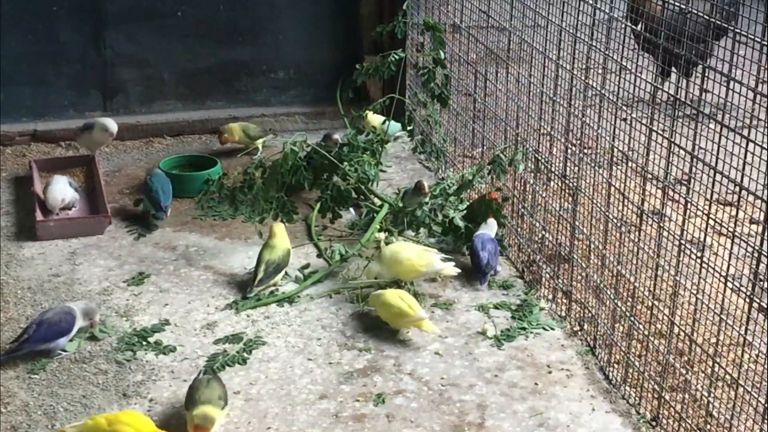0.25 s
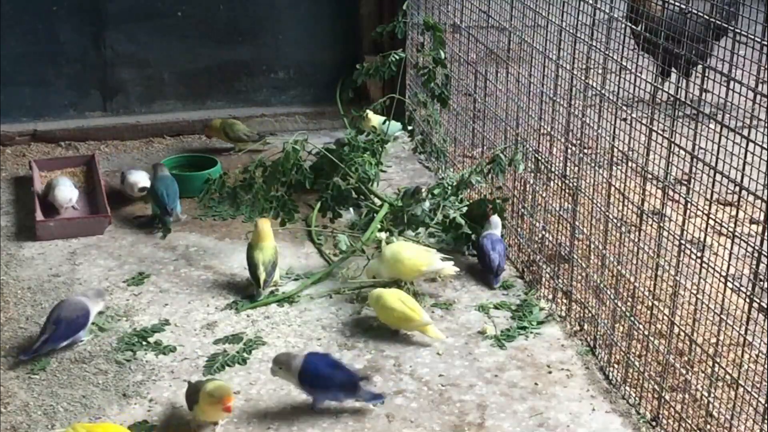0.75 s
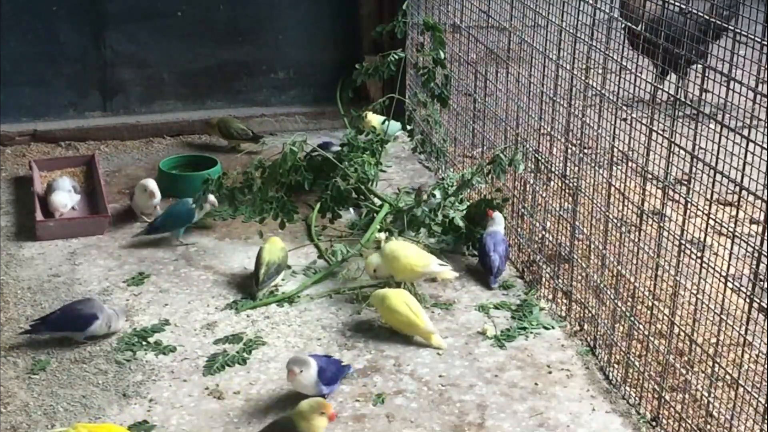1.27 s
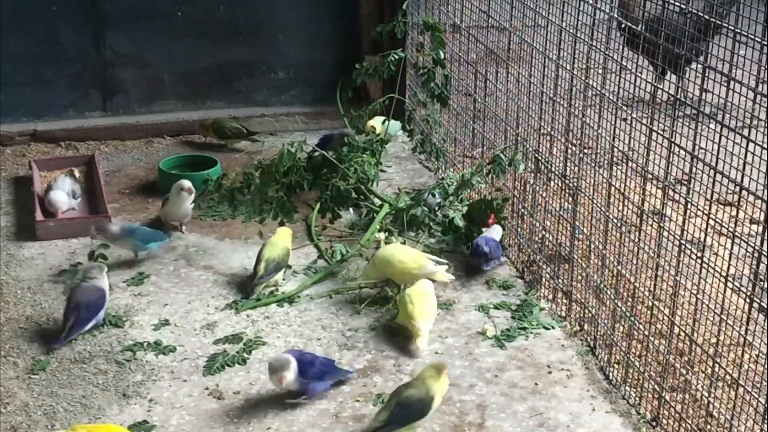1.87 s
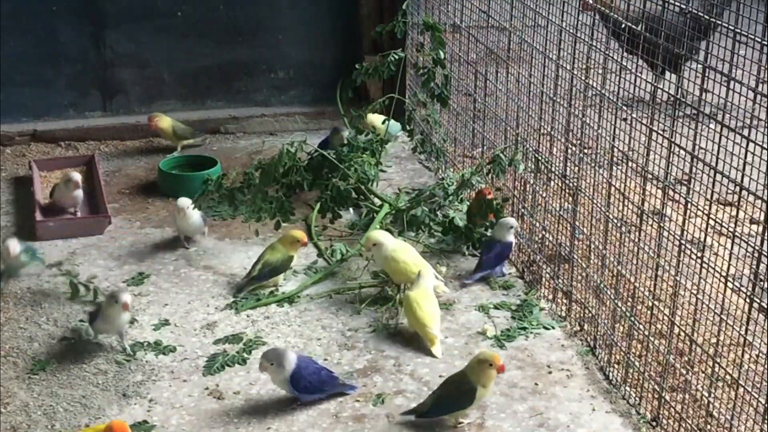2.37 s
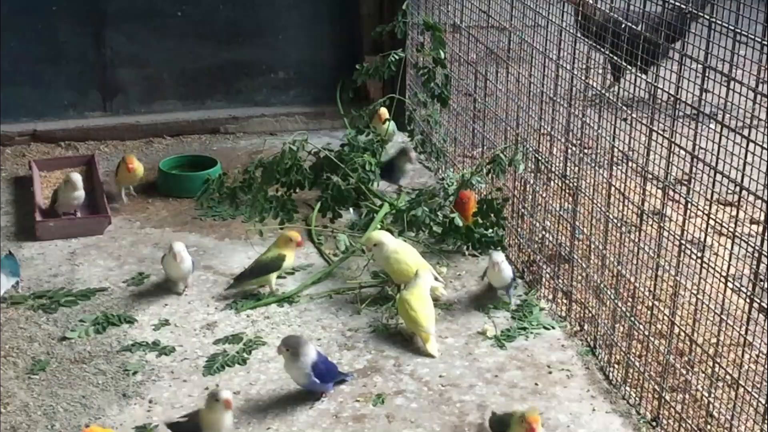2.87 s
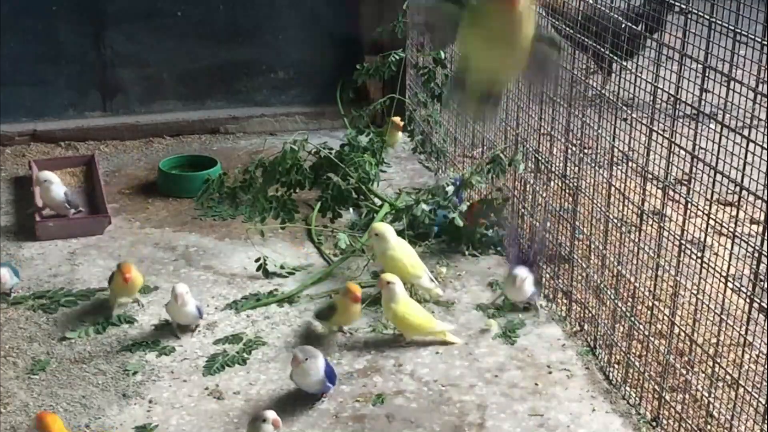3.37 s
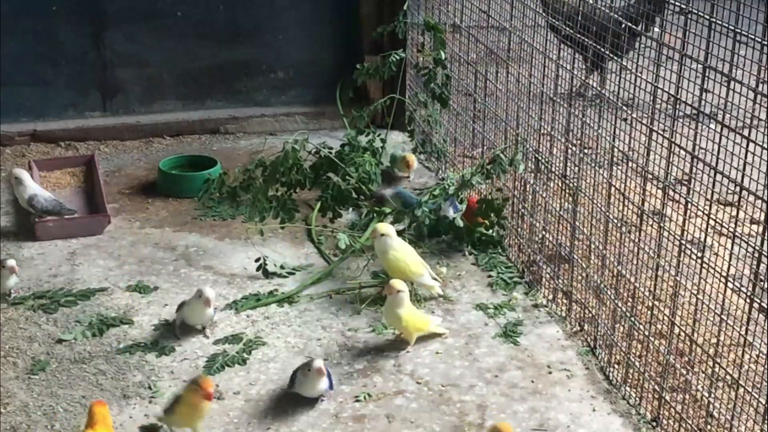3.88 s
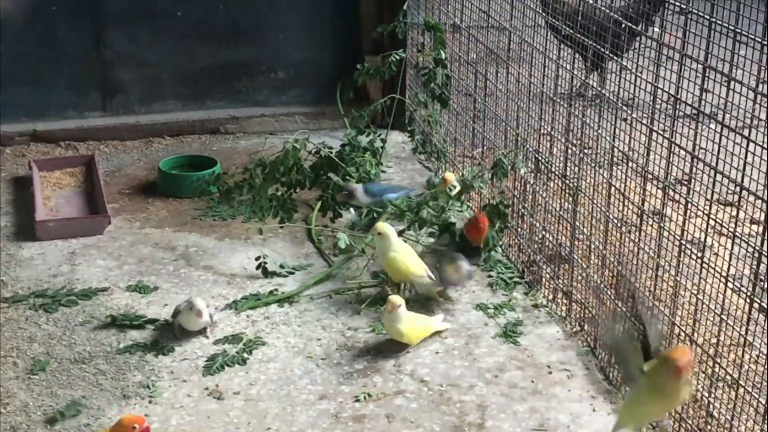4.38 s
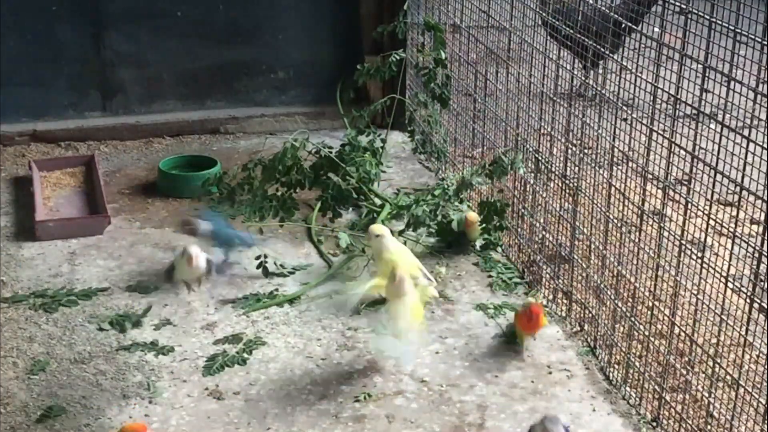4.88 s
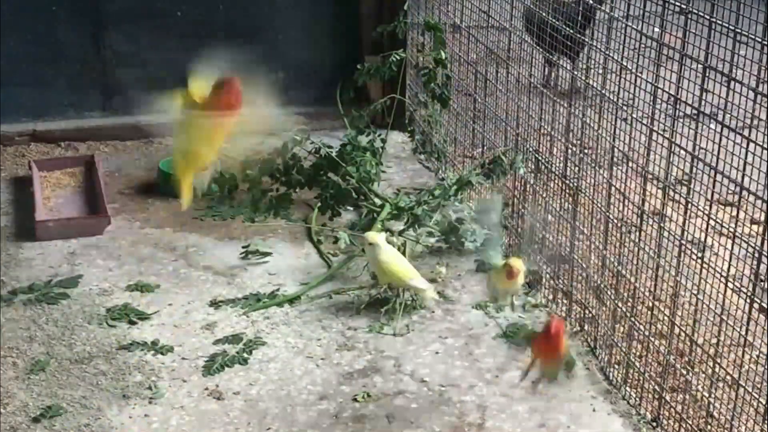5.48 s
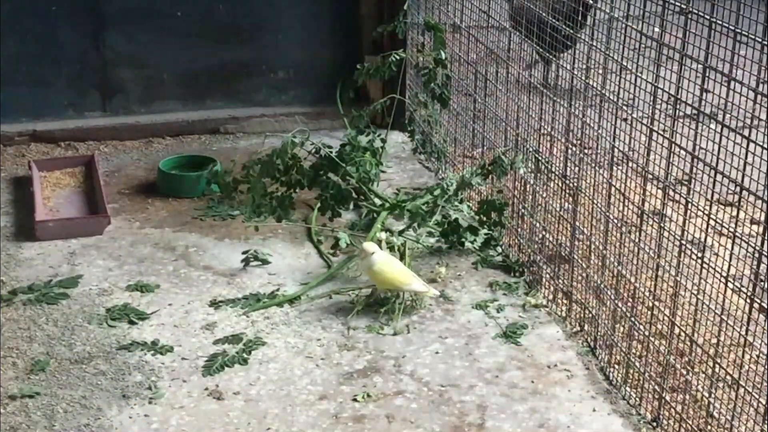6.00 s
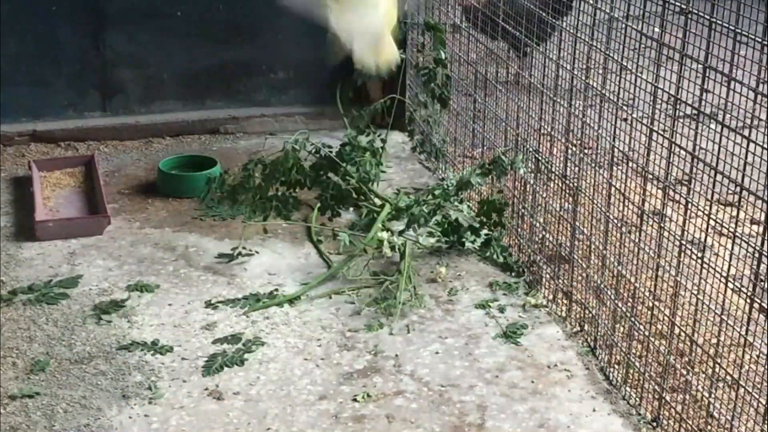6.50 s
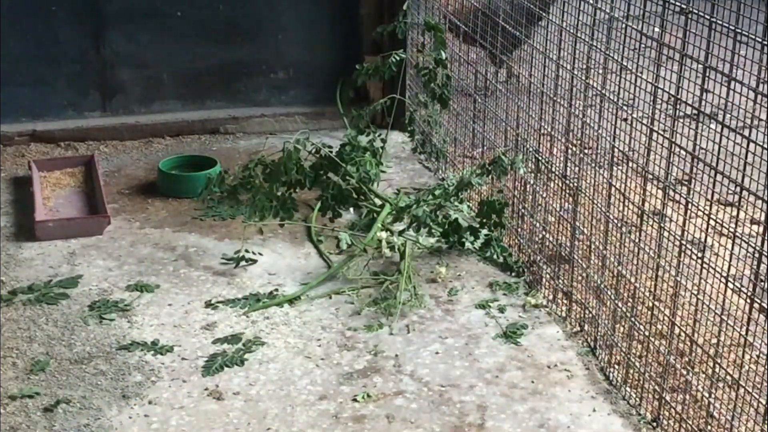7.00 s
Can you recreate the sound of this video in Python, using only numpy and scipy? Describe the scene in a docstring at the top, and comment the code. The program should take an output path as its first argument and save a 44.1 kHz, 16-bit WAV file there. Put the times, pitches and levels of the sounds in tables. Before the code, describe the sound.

A quick cluster of raspy, piercing chirps opens over a faint low hum. A hen clucks softly next door. Small parrots begin fluttering, first in scattered flaps, then in dense waves of wing claps, airy swishes and deep buffeting, with hollow panel booms. Sharp chirps cut through the late rush, then wings thin out and claws click on wire. Close microphone in a small, hard-walled aviary with short echoes.

```python
"""Small parrots feed on the floor of a wire aviary with sheet-metal walls, then take off one after another.
Their wings clap, swish and rumble: shaped noise, with puffs for dull beats and short breathy tones between.
Wall panels boom as dying sine tones; sharp chirps and a hen's clucks next door are gliding overtones,
the opening chirps with rough noisy breath. The wire rings and claws click on it as short noises, a low hum
lies behind, and delays echo the voices, noise bursts, claw clicks and breathy tones."""
import sys
import numpy as np
from scipy import signal
from scipy.io import wavfile

SR = 44100
rng = np.random.default_rng(int(sys.argv[2]) if len(sys.argv) > 2 else 0)


def master_out(mix):
    """Clip the mix to full scale and print it as 16-bit PCM to the path in sys.argv[1]."""
    frames = np.transpose(np.atleast_2d(mix))
    ceiling = np.clip(frames, -1, 1)
    pcm = np.round(ceiling * 32767).astype(np.int16)
    wavfile.write(sys.argv[1], SR, pcm)


def how_loud(loudness_db):
    """Turn decibels into a plain amplitude multiplier (0 dB gives 1, 20 dB gives 10)."""
    steps = np.asarray(loudness_db, float) / 20
    return 10 ** steps


N = 319725  # length in samples


def rms_one(x):
    """Scale a sound to an average (rms) level of 1."""
    return x / np.sqrt(np.mean(x ** 2) + 1e-20)


def at_hz(points, hz):
    """Read a curve of (Hz, dB) points at any pitch, along a logarithmic pitch scale."""
    curve_hz, curve_db = np.array(points).T
    return np.interp(np.log(hz), np.log(curve_hz), curve_db)


def band(x, low_hz, high_hz):
    """Keep mainly the sound between two pitches."""
    sos = signal.butter(2, [low_hz, min(high_hz, .45 * SR)], "band", fs=SR, output="sos")
    return signal.sosfilt(sos, x)


def drift(rate_hz):
    """Slow chance: noise through a double one-pole low-pass; spread 1."""
    r = np.exp(-2 * np.pi * rate_hz * 40 / SR)  # one value per 40 samples
    noise = rng.standard_normal(N // 40 + 2002)
    slow = signal.lfilter([1], [1, -2 * r, r * r], noise)[2000:]  # skip the filter's start
    return np.interp(np.arange(N) / 40, np.arange(len(slow)), rms_one(slow))


def add(out, start_s, sound):
    """Mix a sound in at its start time, cut at the end of the scene."""
    i = round(start_s * SR)
    out[i:i + len(sound)] += sound[:N - i]


def burst(rise_s, t60_s):
    """Loudness shape that rises fast and dies by 60 dB per t60_s; it ends after 0.4 s."""
    t = np.arange(int(SR * .4)) / SR
    return (1 - np.exp(-t / rise_s)) * how_loud(-60 * t / t60_s)


def air(spectrum, patchy_db, flicker_hz):
    """Half-octave bands of noise, each with its own level and flicker; rms 1."""
    lowest_hz, highest_hz = spectrum[0][0], spectrum[-1][0]
    edges = lowest_hz * 2 ** np.arange(0, np.log2(highest_hz / lowest_hz) + .5, .5)
    out, together, white = 0, drift(flicker_hz), rng.standard_normal((2, N))
    for k, (low, high) in enumerate(zip(edges, edges[1:])):
        flicker = 0.72 * together + drift(flicker_hz)  # partly shared by all bands
        gain_db = at_hz(spectrum, np.sqrt(low * high)) + patchy_db * flicker
        out = out + how_loud(gain_db) * band(white[k % 2], low, high)
    return rms_one(out)


def strokes(per_s, lift_db, t60_s):
    """Gain that swells at random instants and dies back to 1: single feather strokes among the many."""
    spread_db = 4.0 * np.clip(rng.standard_normal(N), -2, 1.5)
    kicks = (rng.random(N) < per_s / SR) * how_loud(lift_db + spread_db)
    soft = np.exp(-1 / (.004 * SR))  # 4 ms rise
    fall = how_loud(-60 / (t60_s * SR))
    return 1 + signal.lfilter([1 - soft], np.convolve([1, -soft], [1, -fall]), kicks + 1e-18)


# tones the sheet walls favour: pitch_hz, width_hz, level_db (shifted by hum_db below)
WALL_TONES = [(414, 41, 1.5), (665, 53, 0.5), (939, 32, -2), (1120, 34, 0), (1660, 42, -6), (2300, 71, -4)]


def walls(x, hum_db):
    """Noise sets the sheet walls humming: resonances whose strengths drift by chance."""
    out = x
    for hz, width_hz, db in WALL_TONES:
        r = np.exp(-np.pi * width_hz / SR)
        fed = x * how_loud(db + hum_db + 2.27 * drift(4.9))
        ring = [1, -2 * r * np.cos(2 * np.pi * hz / SR), r * r]
        out = out + signal.lfilter([(1 - r * r) / 2, 0, (r * r - 1) / 2], ring, fed + 1e-18)
    return out


# the flock's stir over time: start_s, downwash_db (on the microphone), drone_db, swish_db, hiss_db
# (swish is set 5.5 dB lower below)
STIR = [(0, -50, -35.5, -51, -43), (.08, -47, -39, -48.5, -52.5), (0.26, -55, -49, -65.5, -64.5),
        (.45, -59, -43, -52.5, -56), (.8, -58, -50.5, -57.5, -63), (1.8, -59, -47, -59, -65),
        (2.05, -73, -41.5, -37.5, -60), (2.4, -51.5, -35, -62, -61), (2.7, -65, -33.5, -35.5, -60.5),
        (2.93, -59, -40, -47.5, -62), (3.2, -41, -38, -37.5, -51.5), (4.1, -30.5, -38.5, -35, -46),
        (4.75, -38, -37.5, -38, -47.5), (5.05, -29, -35, -32, -47.5), (5.55, -45, -37, -43.5, -44.5),
        (5.78, -26, -31.5, -32, -38), (6.0, -38, -39, -38.5, -48.5), (6.68, -37.5, -45, -47, -52),
        (6.9, -32.5, -35, -40, -44.5), (7.25, -47.5, -36, -52.5, -57)]
# tone colours of the four kinds of stirred air, each: pitch_hz, level_db (per Hz)
DOWNWASH = [(18, -37), (30, -9), (65, -3), (110, -4.5), (140, -47), (240, -120)]
DRONE = [(35, -35), (60, -10), (129, 1), (250, -18.5), (390, -38), (660, -120)]
SWISH = [(120, -30), (200, -2), (337, -5.5), (657, -5.5), (1250, -8.5), (1600, -15), (3000, -21.5),
         (3900, -27), (6600, -120)]
HISS = [(710, -51), (1200, -0.5), (4190, -5), (7020, -8), (7730, -19), (8700, -10), (15700, -12.5)]


def stir():
    """Many wings at once blur into buffeting, drone, swish and hiss."""
    start_s, *levels = np.transpose(STIR)
    wash_db, drone_db, swish_db, hiss_db = [np.interp(np.arange(N) / SR, start_s, c) for c in levels]
    wash = how_loud(wash_db) * air(DOWNWASH, patchy_db=-2.0, flicker_hz=9.1)
    drone = how_loud(drone_db) * air(DRONE, patchy_db=4.5, flicker_hz=14.8)
    swish = strokes(per_s=18, lift_db=1.0, t60_s=0.17) * air(SWISH, patchy_db=2.0, flicker_hz=23.0)
    swish = walls(how_loud(swish_db - 5.5) * swish, hum_db=1.0)
    hiss = strokes(per_s=4.6, lift_db=-9.0, t60_s=0.052) * air(HISS, patchy_db=3.0, flicker_hz=17)
    return wash + drone + swish + how_loud(hiss_db) * hiss


HUM_HZ, HUM_WIDTH_HZ, HUM_DB, HUM_FADES_S = 85.4, 7.8, -46, 1.3  # HUM_DB: before the fade


def hum():
    """A faint, wavering low hum from somewhere outside: narrow noise that soon fades by 8 dB."""
    low_hz, high_hz = HUM_HZ - HUM_WIDTH_HZ / 2, HUM_HZ + HUM_WIDTH_HZ / 2
    noise = band(rng.standard_normal(N + SR), low_hz, high_hz)[SR:]
    fade_db = -8 / (1 + np.exp((HUM_FADES_S - np.arange(N) / SR) / 0.14))
    return how_loud(HUM_DB + fade_db) * rms_one(noise)


# chirp syllables: overtones_db (added to a plain voice), rasp (0-1),
# then the glide as rows of start_s, pitch_hz, level_db (at the voice organ)
CHIRPS = [(-1, 0.8, [(0, 4934, -18.5), (.007, 4770, -18.5), (.016, 4730, -17.5), (.021, 4400, -13.5),
          (.032, 4240, -23)]), (-10.5, 0.18, [(.018, 4100, -25), (.022, 3856, -12), (.043, 3845, -26.5)]),
          (4.5, .6, [(0, 1965, -21), (.011, 2267, -21), (.021, 2390, -24.5)]), (0.5, .5, [(0, 3060, -13),
          (.014, 3075, -25)]), (-12.5, 0.63, [(.072, 3930, -23), (.075, 3820, -18), (.08, 3686, -32),
          (.095, 3960, -12), (.107, 3870, -16.5), (.12, 3620, -24.5)]), (-17, 0.38, [(.078, 2474, -25.5),
          (.092, 2614, -21.5), (.11, 2300, -17), (.114, 2260, -20.5)]), (3.5, 0.28, [(.112, 1955, -20.5),
          (.119, 1566, -17), (.128, 1582, -21), (.142, 1580, -27)]), (-28, 0.41, [(.168, 3320, -24.5),
          (.18, 3030, -13), (.19, 3020, -33), (.197, 2744, -23), (.225, 2640, -38)]),
          (-17, 0.51, [(2.191, 3250, -40), (2.225, 3300, -40)]), (0, .6, [(2.2, 11570, -68),
          (2.22, 11800, -59), (2.3, 11050, -54)]), (-23, 0.5, [(5.505, 3370, -37), (5.56, 3240, -35)]),
          (-3, 0.41, [(5.739, 6530, -27), (5.762, 6320, -38)]), (0, 0.088, [(5.735, 1997, -27.5),
          (5.744, 2347, -5), (5.7485, 2520, -10.5)]), (3.5, 0.16, [(5.751, 2520, -9), (5.755, 2602, -8.5),
          (5.767, 2690, -7.5), (5.772, 2650, -15.5), (5.79, 2710, -12.5)]),
          (-10.5, 0.93, [(5.771, 6170, -16), (5.778, 6500, -17), (5.788, 6180, -16.5), (5.797, 6070, -11.5),
          (5.801, 6040, -27)]), (2, 0.13, [(6.379, 2870, -16), (6.383, 3016, -12), (6.389, 3236, -9)]),
          (-5.5, 0.31, [(6.389, 3534, -6.5), (6.395, 4000, -12.5), (6.4, 4710, -5.5), (6.403, 5020, -15)]),
          (-6.5, 0.6, [(6.408, 6160, -12.5), (6.415, 6940, -19.5), (6.419, 6550, -4.5), (6.424, 6840, -8.5),
          (6.429, 7180, -24)]), (0, 0.12, [(6.429, 7120, -4), (6.4325, 5250, -11), (6.439, 4890, -7.5),
          (6.444, 4443, -5.5), (6.459, 4270, -19.5), (6.48, 4390, -28)])]
# second to fifth partial of a plain voice: level_db
OVERTONES_DB = [-7.5, -19.5, -24, -19.5]
# how the beak colours the voice: pitch_hz, level_db
BEAK = [(1500, -12.5), (2900, -11.5), (4000, -3), (7000, 0), (8300, -6.5), (10200, -2.5), (11300, -8),
        (12600, 6.5), (14600, -20), (16000, -93.5)]


def chirps(throb_low_hz, throb_high_hz, waver):
    """Gliding overtones through the beak; the voice organ's throb and waver blur the upper ones most."""
    out = np.zeros(N)
    for bright_db, rasp, glide in CHIRPS:
        s, hz, db = np.transpose(glide)
        t = np.arange(s[0], s[-1], 1 / SR)
        noises = rng.standard_normal((2, len(t) + 2000))
        throb, shake = [rms_one(band(n, throb_low_hz, throb_high_hz)[2000:]) for n in noises]
        pitch = np.interp(t, s, hz)
        phase = 2 * np.pi * np.cumsum(pitch) / SR + waver * rasp * shake
        tone = 0
        for k, partial_db in enumerate([0, *np.add(OVERTONES_DB, bright_db)], 1):
            blur = 0.5 * (k - 1) ** 2.5 * rasp * throb
            tone = tone + how_loud(partial_db + at_hz(BEAK, k * pitch)) * np.sin(k * phase + blur)
        edge = signal.windows.tukey(len(t), min(0.0036 * SR / len(t), 1))  # no click at the ends
        loudness = np.sqrt(2) * how_loud(np.interp(t, s, db)) * (1 + rasp * throb)
        add(out, s[0], loudness * tone * edge)
    return out


# noise bursts: the rough breath of the opening chirps, then wing claps and claw scuffs:
# start_s, level_db (per band near 2 kHz), body_db and treble_db (both relative to level_db)
NOISE_BURSTS = [(0.002, -39.5, -56, 12), (0.08, -42, -29, -3), (0.16, -34, -24, -27),
                (0.418, -53, 7.5, -21), (0.604, -57, 15.5, -33), (1.2, -55, 6.5, -17),
                (1.904, -51.5, -24, -18), (1.9477, -40, 1, -21), (2.229, -47, 0, -15),
                (2.528, -40, 2.5, -15.5), (2.618, -44, 4, -27), (2.797, -38, -4, -4),
                (3.018, -35, 2.5, -16), (3.194, -34.5, -7, -24), (3.264, -35.5, -9, -30),
                (3.324, -39, 12.5, -13), (3.38, -32.5, -4, -14), (3.48, -39, -8, -7.5),
                (3.5515, -37.5, 6, -17.5), (3.597, -31.5, 4.5, 0), (4.001, -23, -5.5, -10.5),
                (4.159, -29, -16, -5.5), (4.202, -33.5, -1, -22), (4.827, -36, -7, 0.5),
                (4.895, -34.5, -1, -7.5), (4.976, -43, -11, -3.5), (4.99, -30, -41, 0.5),
                (5.3339, -37.5, -7, -8.5), (5.4943, -44.5, -16, -5.5), (5.727, -31.5, -31, -7.5),
                (6.128, -51.5, 12, -21), (6.747, -50, 8, -4), (7.075, -45, 4, -23)]
BURST_T60_S = 0.17  # ring-out near 2.5 kHz of a burst at -33.5 dB
BURST_LINGERS = 0.072  # dB of ring-out time per dB of burst
BURST_TOP_DB = -9.5  # the topmost air relative to the treble


def noise_bursts():
    """Crackly noise bands, coloured anew for each burst; the treble starts sharper and dies sooner."""
    out, centres = np.zeros(N), 500 * 2 ** np.arange(0, 5, .25)  # quarter octaves
    crackle = rng.standard_normal((2, N)) * how_loud(0.4 * drift(120))
    own_db = rng.normal(0, 2.8, (len(NOISE_BURSTS), len(centres)))
    late_s = rng.exponential(0.0025, (len(NOISE_BURSTS), len(centres)))  # bands start at uneven instants
    for k, hz in enumerate(centres):
        gate = np.zeros(N)
        snap = 1.33 * burst(6.7 / hz, 0.036)  # a dry snap opens every burst
        for (s, db, body_db, treble_db), colour_db, lag_s in zip(NOISE_BURSTS, own_db, late_s):
            colour = [(800, body_db), (1900, 0), (4000, 0.071 * treble_db), (8000, treble_db),
                      (10300, treble_db), (12000, treble_db + BURST_TOP_DB)]
            level_db = db + at_hz(colour, hz) + colour_db[k]
            t60_s = BURST_T60_S * how_loud(BURST_LINGERS * (db + 33.5)) * (2500 / hz) ** 0.13
            add(gate, s + lag_s[k], how_loud(level_db) * (burst(25.2 / hz + 0.0028, t60_s) + snap))
        out += gate * rms_one(band(crackle[k % 2], hz / 2 ** .09, hz * 2 ** .09))
    return out


# hen clucks: start_s, level_db, pitch_hz (at the start), length_s, hoarseness (0-1)
CLUCKS = [(0.946, -37, 368, 0.056, 0.5), (1.263, -37, 338, 0.046, 0.27), (1.304, -45.5, 352, 0.038, 0.46),
          (1.375, -45.5, 354.3, 0.11, 0.18), (1.41, -39, 338, 0.066, 0.1), (1.507, -45.5, 325, 0.037, 0.17),
          (1.56, -39, 290, 0.032, 0.04), (1.677, -39, 283.5, 0.048, 0.11), (1.783, -38, 358.6, 0.087, 0.39),
          (2.667, -33, 321.6, .1, .5), (2.824, -31.5, 318, 0.054, 0.26),
          (3.328, -27.5, 340.7, 0.0556, 0.25)]
# how the hen's throat colours the voice: pitch_hz, level_db
HEN_THROAT = [(250, -4), (400, -2), (680, 2), (900, -2.5), (1150, -8), (1400, -21), (1700, -25),
              (2200, -35)]


def hen():
    """Short low clucks: bending overtones through the throat, the hoarse ones shaken in level and pitch."""
    out = np.zeros(N)
    for s, db, hz, length_s, hoarse in CLUCKS:
        t = np.arange(0, length_s, 1 / SR)
        noises = rng.standard_normal((2, len(t) + 2000))
        throb, shake = [rms_one(band(n, 13.0, 73)[2000:]) for n in noises]
        phase = 2 * np.pi * (hz * t + 100 * t ** 2) + 1.52 * hoarse * shake  # rises 200 Hz per s
        tone = sum(how_loud(at_hz(HEN_THROAT, k * hz)) * np.sin(k * phase + k * k) for k in range(1, 11))
        swell = np.sin(np.pi * (t / length_s) ** 0.59)
        add(out, s, how_loud(db) * tone * (1 + hoarse * throb) * swell)
    return out


# dull wing beats, each a puff of air with its own colour: start_s, level_db, centre_hz, t60_s
BEATS = [(0.955, -35, 784, 0.23), (2.05, -43, 1880, 0.28), (2.103, -38, 585, 0.65), (2.636, -36, 592, 0.39),
         (2.952, -28.5, 945, 0.25), (3.086, -35.5, 2220, 0.48), (3.092, -31.5, 740, 0.62),
         (3.162, -17, 390, 0.082), (3.28, -29, 932, 0.52), (3.744, -21, 713, 0.13),
         (4.353, -21, 1840, 0.13), (4.707, -28.5, 1120, 0.077), (4.806, -32.5, 2120, 0.55),
         (6.573, -34, 910, 0.059)]


def beats():
    """A downstroke swells softly and stays dull: a narrow and a wide band of noise together."""
    out = np.zeros(N)
    for s, db, hz, t60_s in BEATS:
        shape = burst(5.4 / hz, t60_s)
        noise = rng.standard_normal((2, len(shape)))
        low, high = max(260, hz / 2), max(1350, hz * 1.5)
        narrow = rms_one(band(noise[0], hz / 1.018, hz * 1.092))
        wide = rms_one(band(band(noise[1], low, high), low, high))
        add(out, s, how_loud(db) * shape * (narrow + 0.93 * wide))
    return out


# short breathy tones: hollow pops among the wing beats, a few higher notes, and a faint call near 4.4 kHz:
# start_s, level_db, pitch_hz, t60_s
BREATHY_TONES = [(2.715, -30.5, 1143, 0.23), (2.84, -30, 927, .15), (5.515, -35.5, 4405, .3),
                 (1.415, -51.5, 1660, 0.47), (5.338, -32.5, 5300, .12), (3.485, -26.5, 964, .1),
                 (3.605, -20.5, 1090, 0.14), (3.892, -17, 708, 0.038), (3.381, -18, 1787, 0.086),
                 (4.896, -21, 2275, .08), (4.008, -22, 1075, 0.16), (4.078, -23.5, 1064, 0.14),
                 (4.112, -27.5, 1630, 0.14), (4.163, -18, 1660, 0.11), (4.178, -23, 747, 0.24),
                 (5.059, -20.5, 546, 0.058), (5.1, -20.5, 638, 0.073), (5.678, -23.5, 498, 0.078),
                 (5.708, -21, 1200, 0.035), (5.757, -13.5, 1056, 0.034), (5.853, -15, 1055, 0.046)]


def breathy_tones():
    """Each is one sine tone with a little noise around its pitch, which swells and dies."""
    out = np.zeros(N)
    for s, db, hz, t60_s in BREATHY_TONES:
        shape = burst(2.3 / hz, t60_s)
        breath = rms_one(band(rng.standard_normal(len(shape)), hz / 1.16, hz * 1.18))
        tone = np.sin(2 * np.pi * hz * np.arange(len(shape)) / SR)
        add(out, s, how_loud(db) * shape * (tone + 0.38 * breath))
    return out


# booms of a wall panel: start_s, level_db, t60_s
BOOMS = [(1.998, -29, 0.4), (2.181, -25.5, 0.65), (3.607, -26, 0.52), (3.995, -21, 0.26),
         (4.212, -16.5, 0.81)]
PANEL_HZ = 142.7


def booms():
    """A bird kicking off or landing sets the sheet wall droning at its lowest natural pitch."""
    out = np.zeros(N)
    for s, db, t60_s in BOOMS:
        shape = burst(0.0029, t60_s)
        add(out, s, how_loud(db) * shape * np.sin(2 * np.pi * PANEL_HZ * np.arange(len(shape)) / SR))
    return out


# wire mesh brushed by a wing: start_s, level_db, t60_s
PINGS = [(4.165, -42.5, .12), (4.829, -32, 0.23), (4.985, -32, 0.22), (5.338, -35, 0.23)]
WIRE_HZ = 14800


def wire():
    """A thin, very high ring that shivers as it dies: very narrow noise."""
    gate = np.zeros(N)
    for s, db, t60_s in PINGS:
        add(gate, s, how_loud(db) * burst(0.0038, t60_s))
    return gate * rms_one(band(rng.standard_normal(N), WIRE_HZ - 60, WIRE_HZ + 60))


# claws grip the wire: start_s, level_db (click and rattle are set from it below)
TICKS = [(6.8075, -24.5), (6.8607, -12), (6.867, -20), (6.8923, -14.5), (6.9211, -15)]
TICK_LOW_HZ, TICK_HIGH_HZ, TICK_T60_S = 600, 4650, 0.053


def ticks():
    """A hard click, then a short rattle of noise some way under it."""
    gate, clicks = np.zeros(N), np.zeros(N)
    for s, db in TICKS:
        add(gate, s, how_loud(db - 14.0) * burst(0.0004, TICK_T60_S))
        clicks[round(s * SR)] = how_loud(db + 13.0)  # one sample, which the band filter lowers
    rattle = gate * rms_one(band(rng.standard_normal(N), TICK_LOW_HZ, TICK_HIGH_HZ))
    return band(clicks + 1e-18, TICK_LOW_HZ, TICK_HIGH_HZ) + rattle


ROOM_T60_S, WALL_CUT_HZ = 0.19, 10400


def aviary(x):
    """Echoes between the walls: ten feedback delays, duller on every round, stepped block by block."""
    out, dull = np.zeros(N), np.exp(-2 * np.pi * WALL_CUT_HZ / SR)
    lags = (np.geomspace(.0071, .031, 10) * SR).astype(int)  # 7.1 to 31 ms
    for k, lag in enumerate(lags):
        loop, gain, state = x + 1e-18, how_loud(-60 * lag / SR / ROOM_T60_S), [0.]
        for i in range(lag, N, lag):
            back, state = signal.lfilter([gain * (1 - dull)], [1, -dull], loop[i - lag:i], zi=state)
            loop[i:i + lag] += back[:N - i]
        out += (loop - x) * (-1) ** k
    return out


def scene():
    """Mix all layers; the voices and the short sounds also feed the echoes."""
    voices = chirps(throb_low_hz=80.0, throb_high_hz=315, waver=0.75) + hen()
    short_sounds = walls(noise_bursts(), hum_db=-7.5) + ticks() + breathy_tones()
    echoes = aviary(how_loud(-14.5) * voices + how_loud(-17.5) * short_sounds)
    return (voices + short_sounds + echoes + beats() + booms() + wire() + stir() + hum())[None]


def low_pass(x):
    """Removes everything above the highest recorded frequency."""
    return signal.sosfilt(signal.butter(12, 15890, fs=SR, output="sos"), x)


def record(dry):
    """The deepest bass is cut and the loudest peaks are rounded."""
    bass_cut = signal.sosfilt(signal.butter(3, 34, "high", fs=SR, output="sos"), dry)
    mix = 0.84 * np.tanh(bass_cut / 0.95)
    return low_pass(mix)


dry = scene()
out = record(dry)
master_out(out)
```